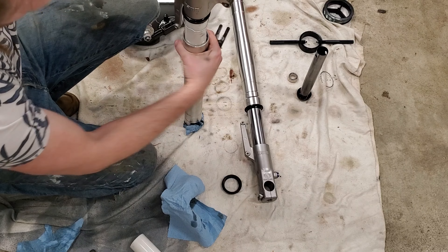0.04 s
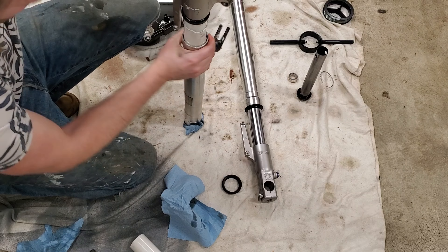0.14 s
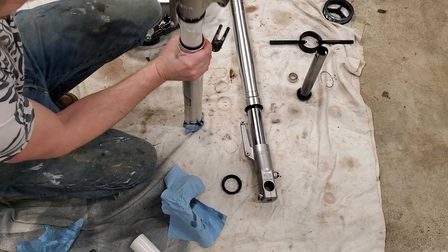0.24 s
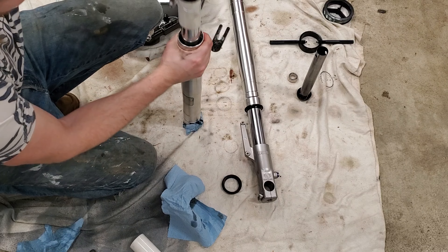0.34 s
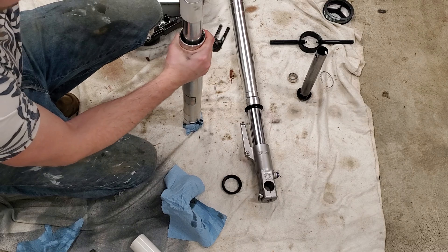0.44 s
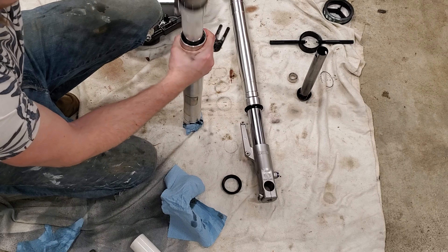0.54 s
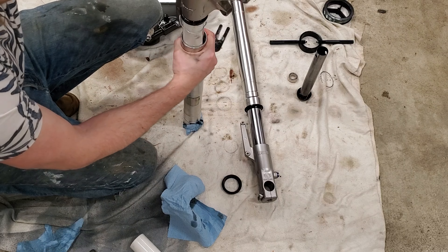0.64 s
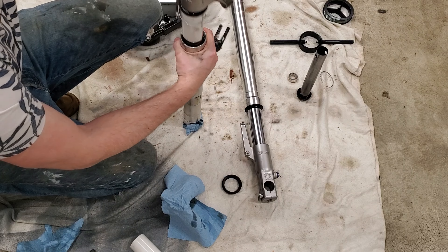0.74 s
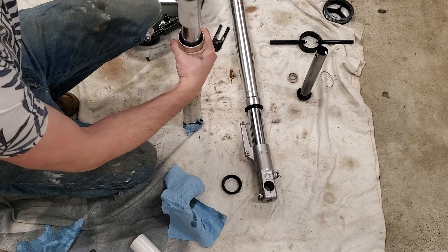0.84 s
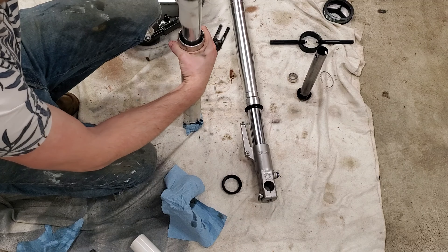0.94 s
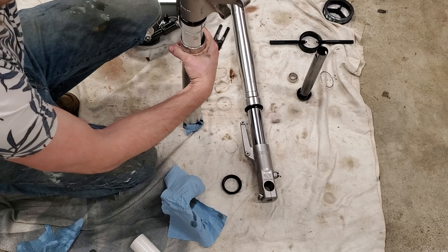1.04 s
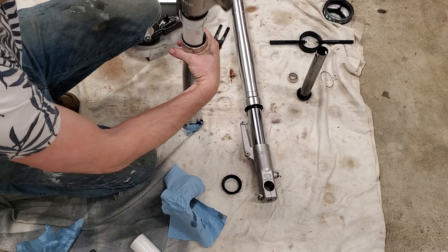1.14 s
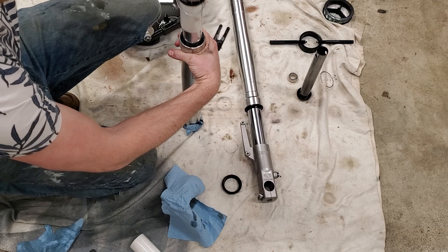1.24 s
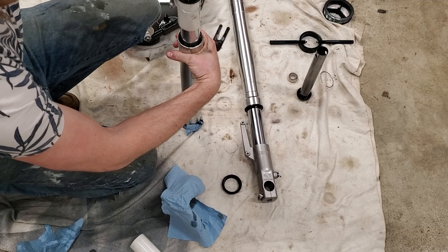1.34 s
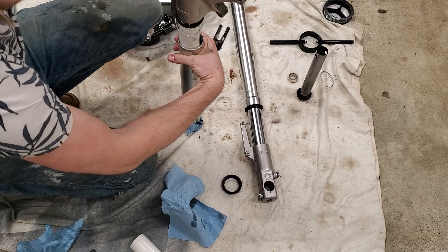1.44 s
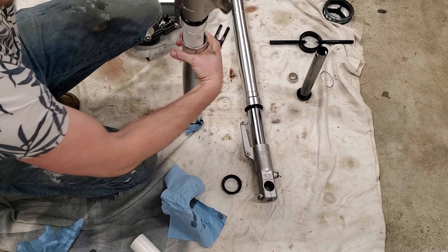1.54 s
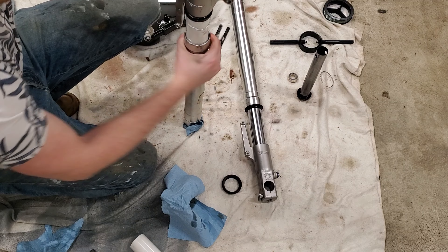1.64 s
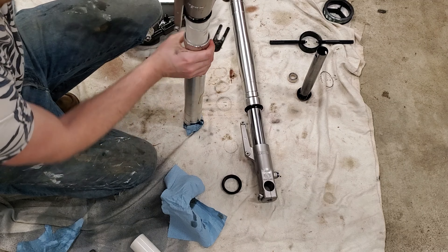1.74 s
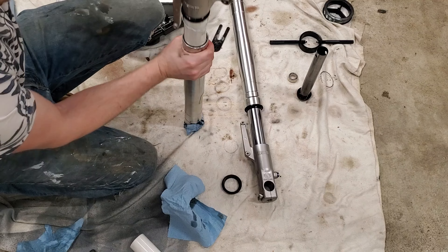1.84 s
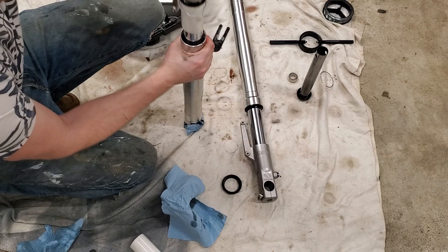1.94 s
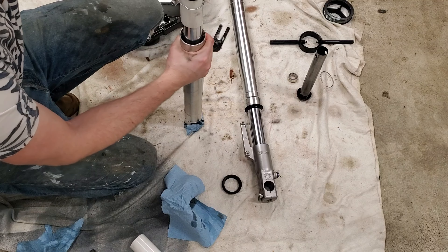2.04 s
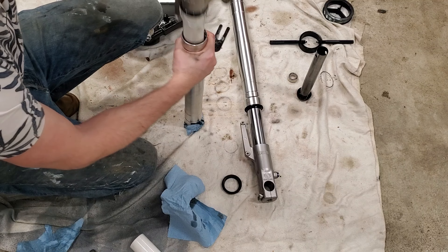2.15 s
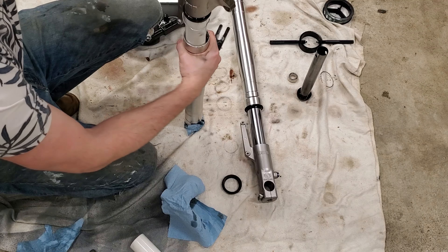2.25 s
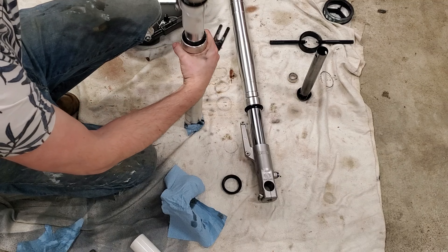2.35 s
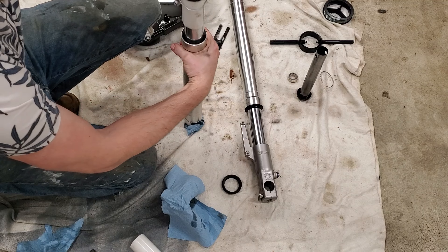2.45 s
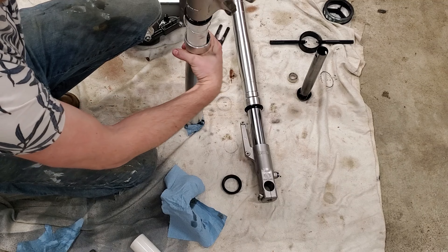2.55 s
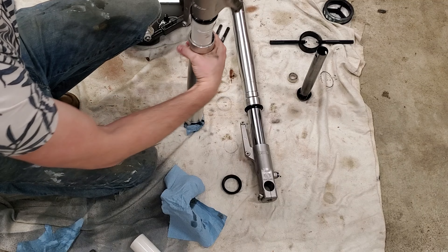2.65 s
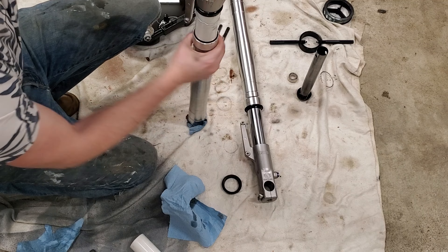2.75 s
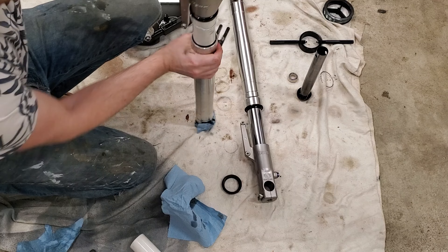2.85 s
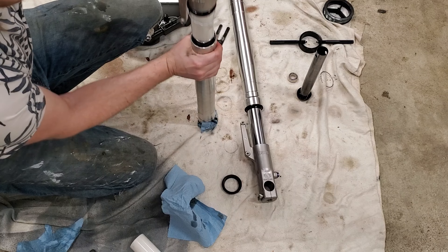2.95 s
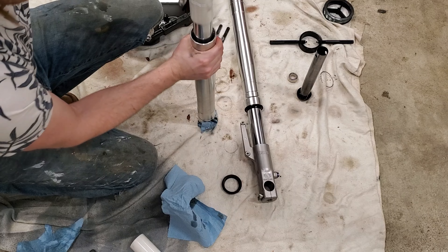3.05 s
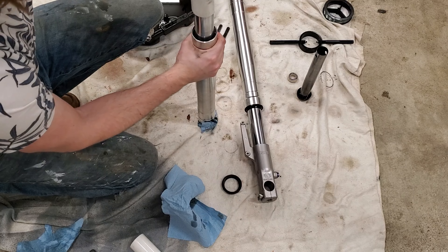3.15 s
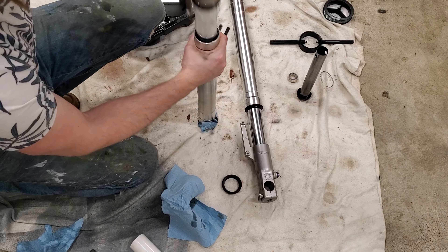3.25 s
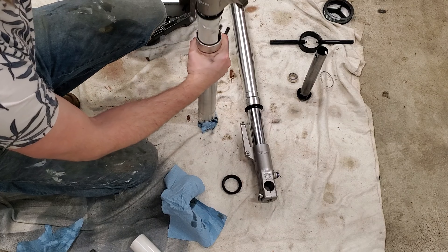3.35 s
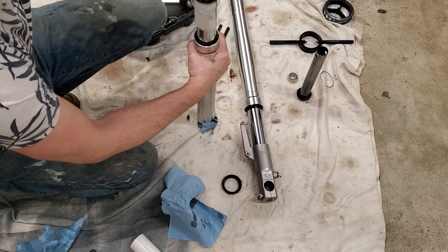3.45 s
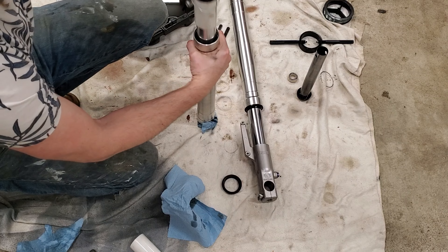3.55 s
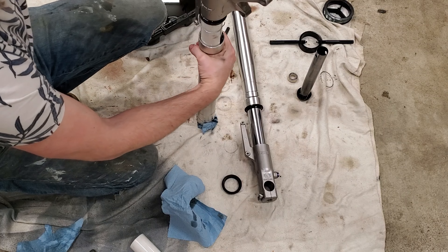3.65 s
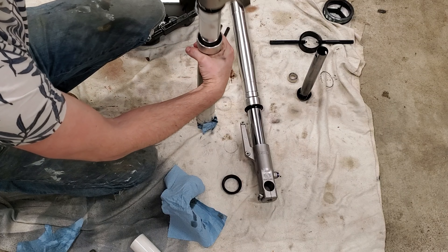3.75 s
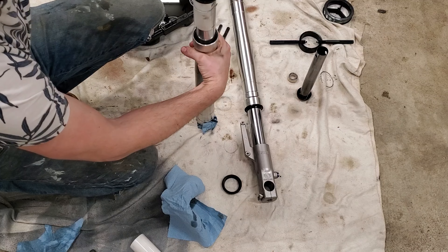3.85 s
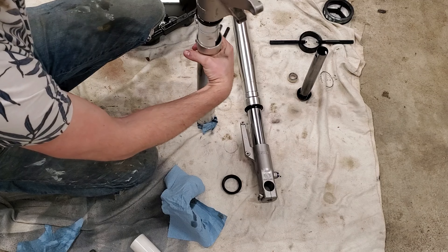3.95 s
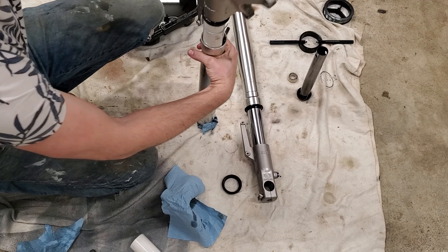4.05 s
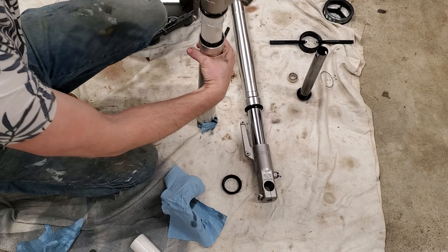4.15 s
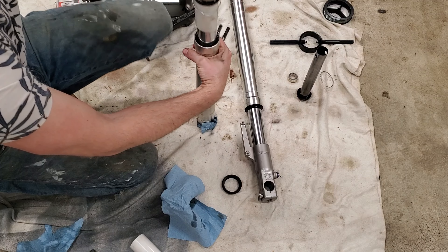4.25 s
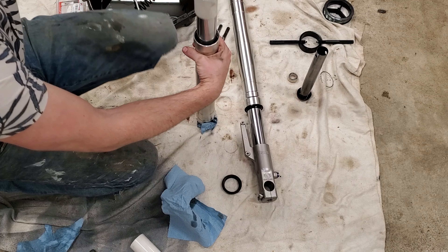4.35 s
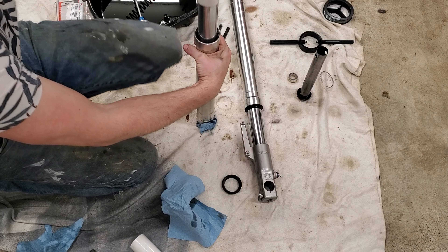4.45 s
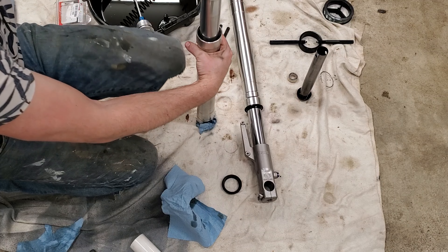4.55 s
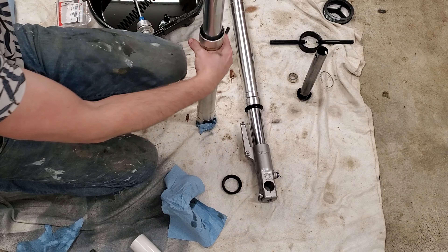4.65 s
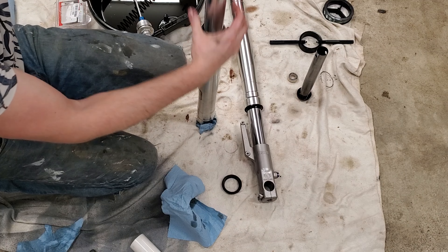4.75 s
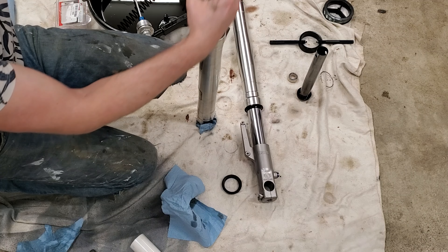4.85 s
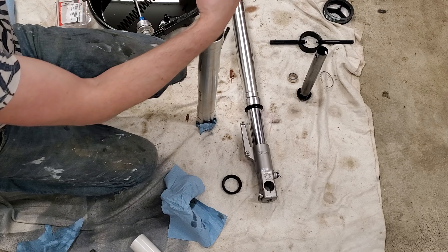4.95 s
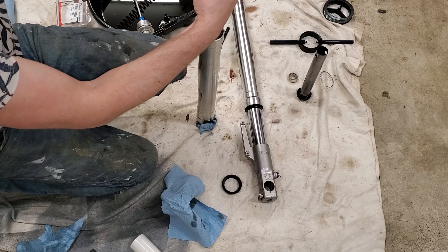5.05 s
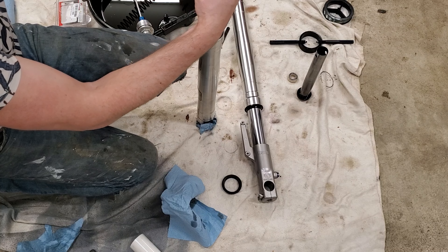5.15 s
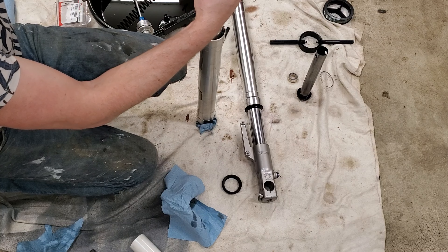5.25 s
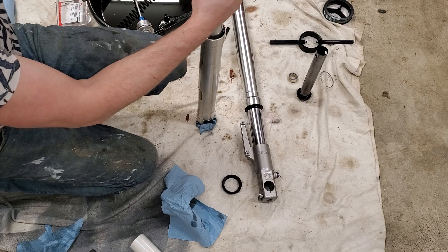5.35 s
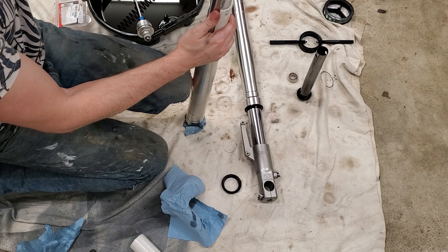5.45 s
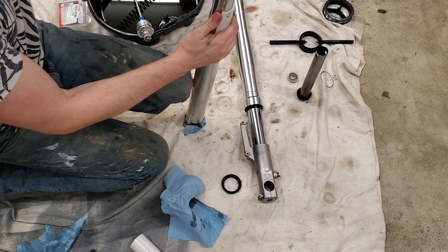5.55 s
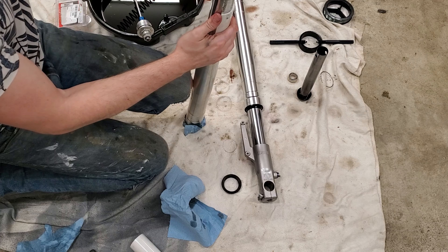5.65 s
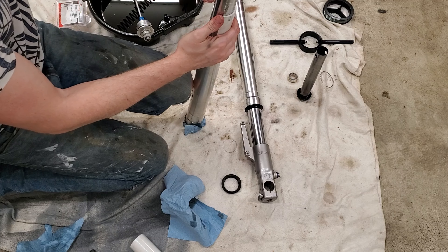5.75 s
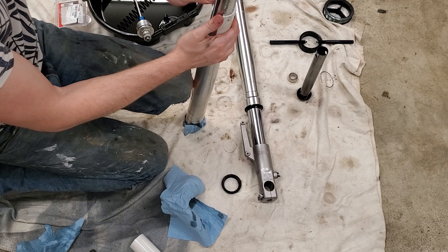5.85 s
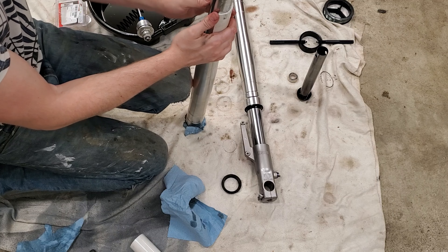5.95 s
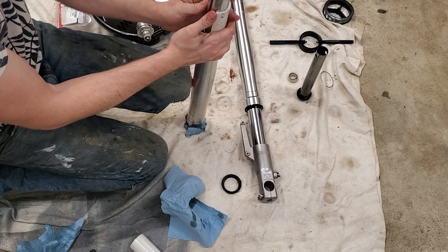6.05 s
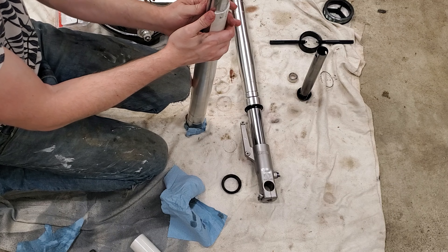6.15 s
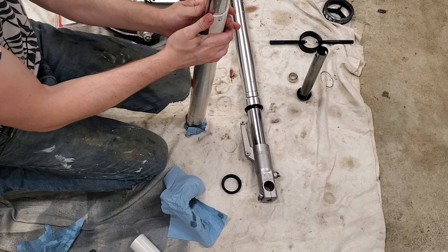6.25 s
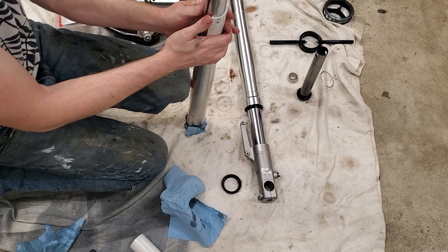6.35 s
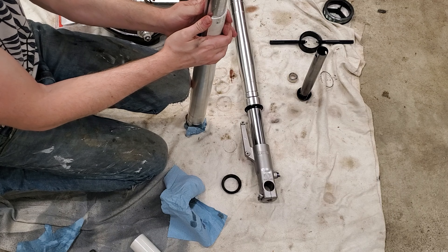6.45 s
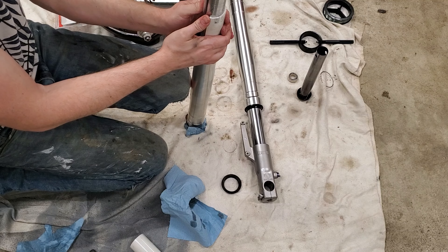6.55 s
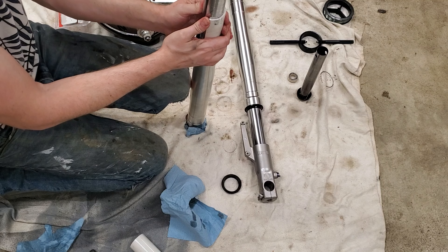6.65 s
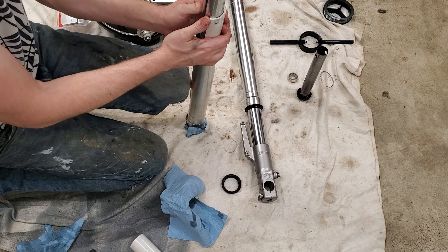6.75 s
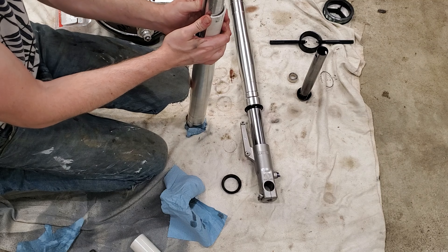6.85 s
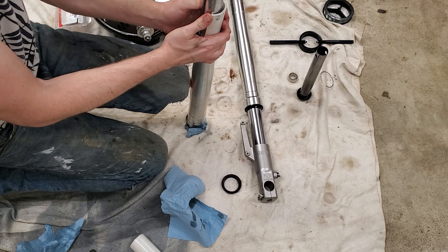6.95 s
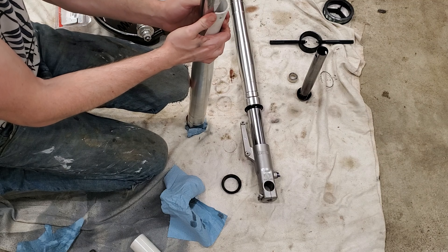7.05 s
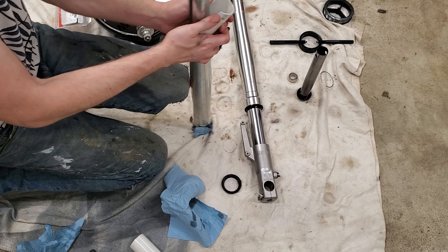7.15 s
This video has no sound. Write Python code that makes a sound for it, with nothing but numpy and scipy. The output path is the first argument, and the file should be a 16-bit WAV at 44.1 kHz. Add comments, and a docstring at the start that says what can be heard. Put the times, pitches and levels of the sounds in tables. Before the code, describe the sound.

Hard hollow pipe clicks with heavy thuds strike in uneven rhythm, booming through a quiet garage, then soft hand rubbing, bumps and light taps.

```python
"""A quiet garage rumbles, hisses and hums while a steel fork tube, slid down on a plastic pipe, drives home an oil seal.
Before each blow the tube hisses down the pipe; the hit is a hard click of the pipe,
then a thud as the fork leg, standing on a cloth, takes the load; the garage booms and rings for half a second.
In each pause between blows the tube hisses softly upward, and now and then the hands shift their grip.
After the last blow hands go on rubbing, leg and knee bump softly on the cloth and pipe and tube tap lightly."""
import sys
import numpy as np
from scipy import signal
from scipy.fft import rfft, irfft, next_fast_len
from scipy.io import wavfile
from scipy.ndimage import uniform_filter1d, map_coordinates

SR = 44100
rng = np.random.default_rng(int(sys.argv[2]) if len(sys.argv) > 2 else 0)


def master(y):
    """Save y as 16-bit WAV."""
    cut = np.clip(np.atleast_2d(y).T, -1, 1)
    pcm = np.round(cut * 32767)  # scale
    wavfile.write(sys.argv[1], SR, pcm.astype(np.int16))


N = 316990
TIME = np.arange(N) / SR
T = np.arange(SR) / SR  # one second, the life of a blow
HZ = np.fft.rfftfreq(SR, 1 / SR)  # bins 1 Hz apart


def amp(db):
    """Decibels to gain."""
    return 10 ** (np.asarray(db) / 20)


def unit(x):
    """Scale to rms 1."""
    return x / np.sqrt(np.mean(x ** 2) + 1e-20)


def along(points, hz):
    """Read (frequency, value) points on a log frequency axis."""
    f, v = np.transpose(points)
    return np.interp(np.log(hz + 1), np.log(f + 1), v)


def swell(middle, half):
    """A smooth bell-shaped rise and fall around a moment."""
    return np.exp(-.5 * ((TIME - middle) / half) ** 2)


def causal(gain):
    """The minimum-phase response that has this gain."""
    cepstrum = irfft(np.log(np.maximum(gain, 1e-6)))
    cepstrum[1:SR // 2] *= 2
    cepstrum[SR // 2 + 1:] = 0
    return np.exp(rfft(cepstrum))


def resonance(hz, width):
    """Response of one damped mode, 1 at its peak."""
    return 1j * HZ * width / (hz ** 2 - HZ ** 2 + 1j * HZ * width)


def late(seconds):
    """Response of a delay."""
    return np.exp(-2j * np.pi * HZ * seconds)


def even(x, span_hz):
    """Spectrum of x with its chance humps and hollows wider than span_hz levelled."""
    spectrum = rfft(x)
    power = np.mean(np.abs(np.atleast_2d(spectrum)) ** 2, axis=0)
    power = uniform_filter1d(power, size=max(int(span_hz), 1))
    return spectrum / np.sqrt(np.abs(power) + 1e-20)


def add(track, s, spectrum):
    """Mix a stereo sound, given by its spectrum, into the track at time s, with its short lead-in."""
    lead = 128  # samples
    sound = np.roll(irfft(spectrum), lead, axis=1)
    start = round(s * SR) - lead
    lo, hi = max(start, 0), min(start + SR, N)
    if hi > lo:
        track[:, lo:hi] += sound[:, lo - start:hi - start]


# left-right likeness of sound from all sides: (frequency [Hz], coherence [-1 to 1])
LIKENESS = [(60, 0.83), (180, 1), (350, 0.15), (700, 0.33), (1400, 0.16), (3000, -0.012), (6000, .15),
            (11000, -.05)]


def diffuse(spectrum, size):
    """Coloured noise from all sides: alike at both ears in the bass, unrelated in the treble."""
    length = next_fast_len(size)
    hz = np.fft.rfftfreq(length, 1 / SR)
    turn = np.arccos(np.clip(along(LIKENESS, hz), -1, 1)) / 2
    noise = rfft(rng.standard_normal((2, length))) * amp(along(spectrum, hz))
    mid, side = noise * [np.cos(turn), np.sin(turn)]
    return irfft(np.array([mid + side, mid - side]), length)[:, :size]


# colour of the still garage air with its thin hiss: (frequency [Hz], relative level per Hz [dB])
AIR_COLOUR = [(25, -16), (48, 1), (72, 0.5), (157, -11.5), (354, -25), (560, -28.5), (1130, -35.5),
              (2480, -41), (4610, -42), (5600, -36.5), (6600, -32), (7900, -53), (14400, -40),
              (16000, -49.5)]


def background(air_db=-57, hum_db=-62):
    """Low room rumble and faint hiss as coloured noise, with an electrical hum as a steady sine."""
    hum = np.sin(2 * np.pi * 59.5 * TIME)
    return amp(air_db) * unit(diffuse(AIR_COLOUR, N)) + amp(hum_db) * hum


# colour of the garage's diffuse answer: (frequency [Hz], level [dB])
WALL_COLOUR = [(30, -13.5), (60, 3.5), (150, 4), (500, 0.5), (900, 4), (1500, 4), (4000, 4), (8000, -2),
               (15000, 4.5)]
# how fast the diffuse answer dies: (frequency [Hz], time to fall 60 dB [s])
FADE_TIMES = [(60, 0.28), (300, 0.41), (800, 0.37), (2000, 0.41), (4500, 0.43), (8000, .42), (15000, 0.25)]


def reverberation(build_s=0.052, gap_s=0.001, room_db=1):
    """Dense reflections hold their level while the room fills, then each band dies at its own speed."""
    hz, t, bands = signal.stft(diffuse(WALL_COLOUR, SR), SR, nperseg=256)
    age = np.hypot(t, build_s) - build_s
    fade = amp(-60 * age / along(FADE_TIMES, hz)[:, None])
    tail = signal.istft(bands * fade, SR, nperseg=256)[1][:, :SR]
    tail = irfft(even(tail, span_hz=41.5) * amp(room_db + along(WALL_COLOUR, HZ)))
    onset = 1 - np.exp(-T / gap_s)
    return rfft(tail * onset * (T < .8))


# standing waves of the garage: (frequency [Hz], level [dB])
ROOM_MODES = [(63, -31), (77, -50.5), (93, -48.5), (118.3, -46), (175.2, -45), (230, -56.5), (292, -48.5),
              (331, -53.5), (435.4, -54), (491.2, -56.5), (532.3, -51.5), (613, -54.5), (687, -54),
              (717, -55), (791, -60.5), (866, -56)]


def standing_waves(arrival_s=0.0077, swell_cycles=0.3, t60_s=0.42):
    """Room modes swell within a cycle or so, then ring down together."""
    ring = sum(amp(db) * np.cos(2 * np.pi * hz * T) * (1 - np.exp(-T * hz / swell_cycles))
               for hz, db in ROOM_MODES)
    return rfft(ring * np.exp(-np.log(1000) * T / t60_s)) * late(arrival_s)


def lingering(note_hz=313, note_db=-72, t60_s=1.3):
    """One faint low note outlasts the boom of the room."""
    return rfft(amp(note_db) * np.sin(2 * np.pi * note_hz * T) * np.exp(-np.log(1000) * T / t60_s))


def near_paths(lead_s=.00004, floor_db=-7, ceiling_db=-10):
    """The direct sound, a little earlier on the left, and its first bounces off floor and ceiling."""
    direct = np.array([late(0), late(lead_s)])
    cloth = 1 / (1 + 1j * HZ / 1500)  # the cloth on the floor swallows the treble
    return direct + amp(floor_db) * cloth * late(0.0066) + amp(ceiling_db) * late(.018)


def friction(colour, grain_db=1.0):
    """Rubbing noise of rms 1 with a fine stick-slip grain."""
    grain = unit(uniform_filter1d(rng.standard_normal(N), size=400))
    return unit(diffuse(colour, N) * amp(grain_db * grain))


# hands shifting their grip on tube and pipe: (middle [s], half length [s], typical level [dB])
GRIP_SHIFTS = [(2.917, 0.11, -60), (3.361, .03, -59.5), (4.5, .17, -67), (4.805, 0.026, -54.5),
               (5.039, 0.041, -66.5), (5.28, 0.17, -68), (6.185, 0.052, -68.5), (7.156, .07, -65)]
# colour of skin on the tube: (frequency [Hz], level [dB])
SKIN_COLOUR = [(200, -11.5), (900, -0.5), (2400, -8.5), (3800, 0), (6400, 7), (8000, -9.5), (11000, -6.5),
               (14500, -1), (16000, -2)]


def handling(uneven_db=6.5, changes_per_s=14):
    """Each shift of the grip is a swell of skin friction under an uneven pressure of the fingers."""
    stroke = sum(amp(db) * swell(s, half) for s, half, db in GRIP_SHIFTS)
    pressure = map_coordinates(rng.standard_normal(size=256), [TIME * changes_per_s], mode="mirror")
    return stroke * amp(uneven_db * pressure) * friction(SKIN_COLOUR)


# colour of the tube rubbing on the pipe: (frequency [Hz], level [dB])
RUB_COLOUR = [(200, -5), (900, 5), (2400, -7), (3800, 3), (6400, 2.5), (8000, -13), (11000, -11.5),
              (14500, -7), (16000, -4)]


def sliding(down_db=-61, rise_s=.06, stop_s=.02, lift_db=-64.5, lift_at=.6, lift_spread=0.12):
    """Friction swells as the tube comes down and dies at contact; each pause has a softer lift."""
    times = [s for s, *_ in HITS]
    # rise_s and stop_s: times in which the hiss grows before contact, and dies after it, by a factor e
    down = sum(np.exp(np.minimum((TIME - s) / rise_s, (s - TIME) / stop_s)) for s in times)
    # lift_at and lift_spread: middle and half length of the lift as shares of the pause
    up = sum(swell(s + lift_at * pause, lift_spread * pause) for s, pause in zip(times, np.diff(times)))
    return (amp(down_db) * down + amp(lift_db) * up) * friction(RUB_COLOUR)


# colour of the pipe's click: (frequency [Hz], level [dB])
PIPE_COLOUR = [(100, -18), (500, -10.5), (800, -5.5), (1150, -3), (1600, 2), (2200, -7.5), (3100, -0.5),
               (5000, -1.5), (6700, 0.5), (7800, -10), (11000, -10.5), (15500, -14)]


def click(ring_hz, ring_db, width_hz=1100):
    """The struck pipe rings very briefly, at a pitch set by how it sits."""
    return causal(amp(along(PIPE_COLOUR, HZ))) * (1 + amp(ring_db) * resonance(ring_hz, width_hz))


# hard little contacts of pipe and tube: (time [s], level [dB], ring [Hz])
LIGHT_TAPS = [(3.311, -40, 5850), (5.214, -50.5, 1523), (5.611, -52, 1533), (7.185, -17.5, 1830)]


def taps(near):
    """Pipe and tube touch lightly: a click with a strong, narrow ring, answered by the garage."""
    track = np.zeros((2, N))
    pipe_room = near + reverberation()
    for s, db, ring_hz in LIGHT_TAPS:
        add(track, s, amp(db) * click(ring_hz, ring_db=15.0, width_hz=565) * pipe_room)
    return track


# modes of the fork leg on the floor: (frequency [Hz], width [Hz], level [dB])
LEG_MODES = [(125, 100, -1), (266.4, 170, 1.5), (453, 180, 5), (692, 180, 2.2), (835, 130, 2)]


def thud(bandwidth_hz, lag_s=.0021, slope=4., radiate_hz=50):
    """The load reaches the leg after a short lag; a softer contact leaves out its upper modes."""
    force = 1 / np.sqrt(1 + (HZ / bandwidth_hz) ** (2 * slope))
    radiation = HZ ** 2 / np.hypot(HZ ** 2, radiate_hz ** 2)  # the slim leg moves little air in the deep bass
    # neighbouring modes move in opposite senses
    leg = sum((-1) ** k * amp(db) * resonance(hz, width) for k, (hz, width, db) in enumerate(LEG_MODES))
    return causal(force * radiation) * leg * late(lag_s)


# soft bumps of knee and leg on the cloth: (time [s], level [dB])
SOFT_BUMPS = [(0.484, -17), (5.062, -23), (5.203, -5.5), (6.421, -13)]


def bumps(leg_room):
    """Knee and leg meet the cloth so softly that only the lowest part of a thud is left."""
    track = np.zeros((2, N))
    for s, db in SOFT_BUMPS:
        add(track, s, amp(db) * thud(bandwidth_hz=120) * leg_room)
    return track


def chatter(chatter_s=0.0014, touch_db=-23, touch_s=0.00027):
    """The pipe's rim touches lightly, then seats in a millisecond or two of tiny contacts."""
    contacts = even(rng.standard_normal(SR) * np.exp(-T / chatter_s), span_hz=1450)
    return contacts * (1 + amp(touch_db) * late(-touch_s))


def rebound(ring_hz=1540, width_hz=720, rebound_db=-12.0, lag_s=.0052):
    """The load springs back and the tube clacks in its guide."""
    return amp(rebound_db) * resonance(ring_hz, width_hz) ** 2 * late(lag_s)


# blows: (time [s], strength [dB], contact bandwidth [Hz], higher = harder, pipe ring [Hz])
HITS = [(-.0626, 27, 1200, 2480), (0.6792, 24.5, 1000, 4470), (1.125, 24.5, 770, 3700),
        (1.522, 26.5, 890, 4220), (2.2873, 22, 810, 3127), (2.6585, 21.5, 1080, 3000),
        (3.3982, 22, 560, 3200), (3.7405, 21.5, 615, 4500), (4.0375, 26, 870, 4520)]


def blows(near, leg_room, usual_db=24, usual_hz=850, direct_db=-1.5):
    """Click, thud and rebound; the leg's echoes repeat, the click scatters anew off the moving arms."""
    track = np.zeros((2, N))
    for s, db, bandwidth_hz, ring_hz in HITS:
        stronger_db = db - usual_db
        # a stronger, harder blow clicks louder: 4 dB as usual, 2.5 dB more per octave of bandwidth
        click_db = 4 + stronger_db + 2.5 * np.log2(bandwidth_hz / usual_hz)
        # a stronger one also rings the pipe more over its click
        ring_db = 1 + 1.1 * stronger_db
        # the chatter differs by direction, so it evens out in the room's answer
        pipe_room = amp(direct_db) * chatter() * near + reverberation()
        crack = amp(click_db) * click(ring_hz, ring_db) * pipe_room
        load = amp(db) * (thud(bandwidth_hz) + rebound()) * leg_room
        add(track, s, crack + load)
    return track


def scene(shade_db=-1):
    """The quiet garage, hands, sliding, taps, bumps and blows."""
    near = near_paths()
    # the kneeling body partly shades the leg's near sound; the leg stays on one spot
    leg_room = amp(shade_db) * near + standing_waves() + lingering() + reverberation()
    return background() + handling() + sliding() + taps(near) + bumps(leg_room) + blows(near, leg_room)


def record(dry, top_hz=16200):
    """A steep low-pass keeps nothing of the treble far above its band limit."""
    return signal.fftconvolve(dry, signal.firwin(201, top_hz, fs=SR)[None], "same", axes=1)


dry = scene()
out = record(dry)
master(out)
```